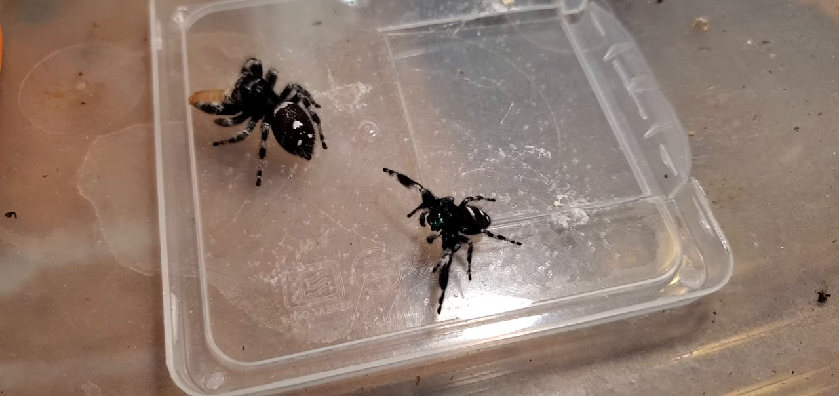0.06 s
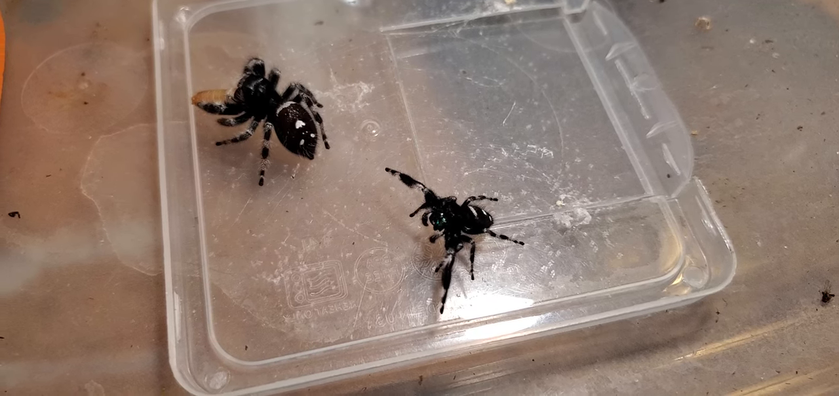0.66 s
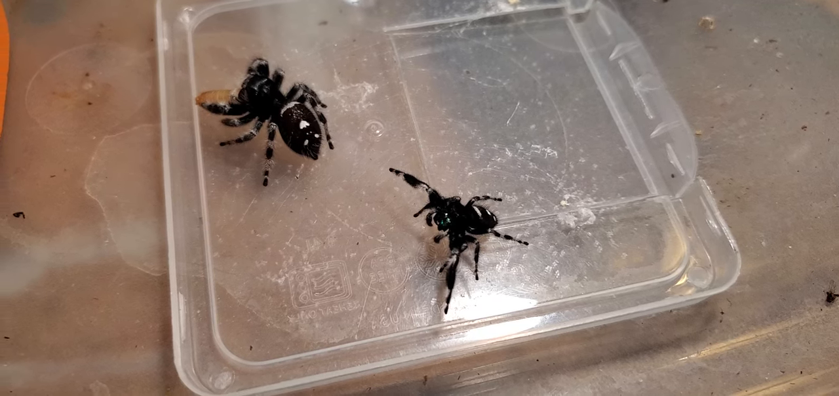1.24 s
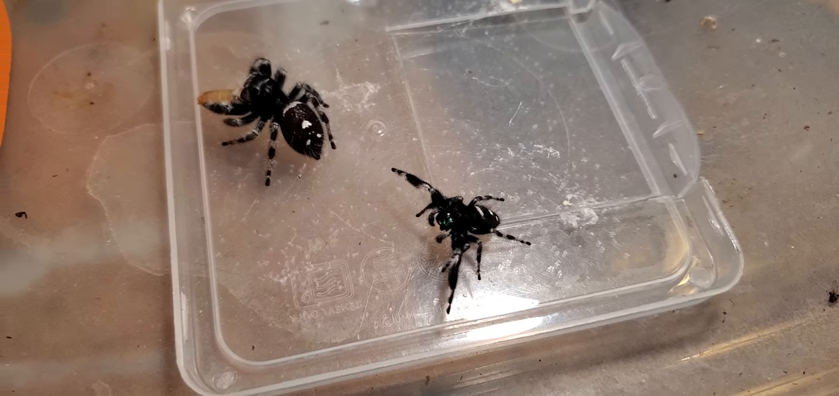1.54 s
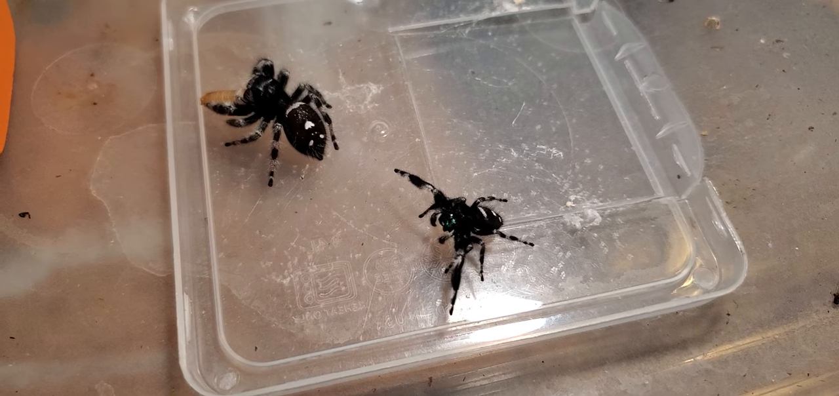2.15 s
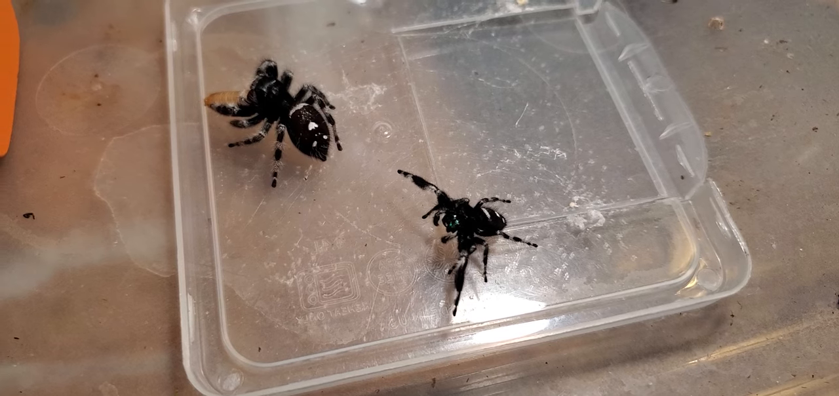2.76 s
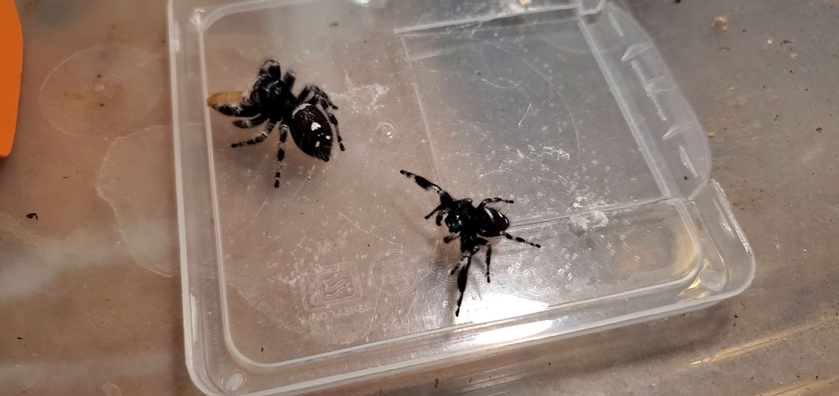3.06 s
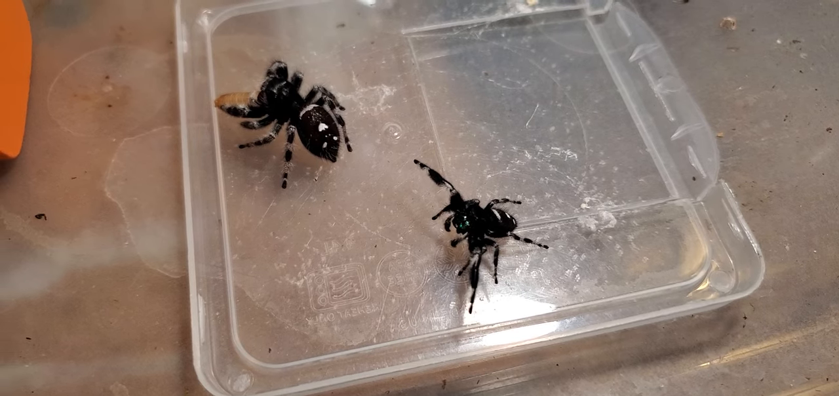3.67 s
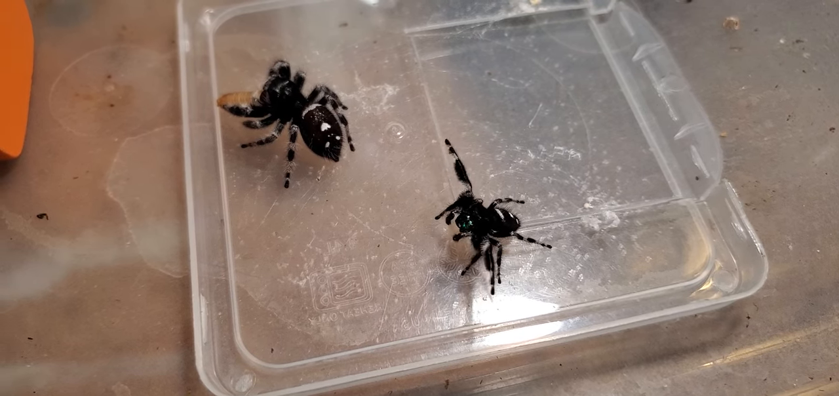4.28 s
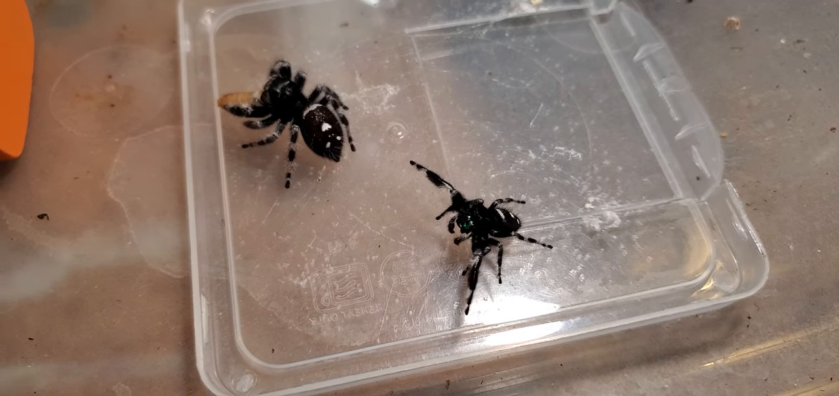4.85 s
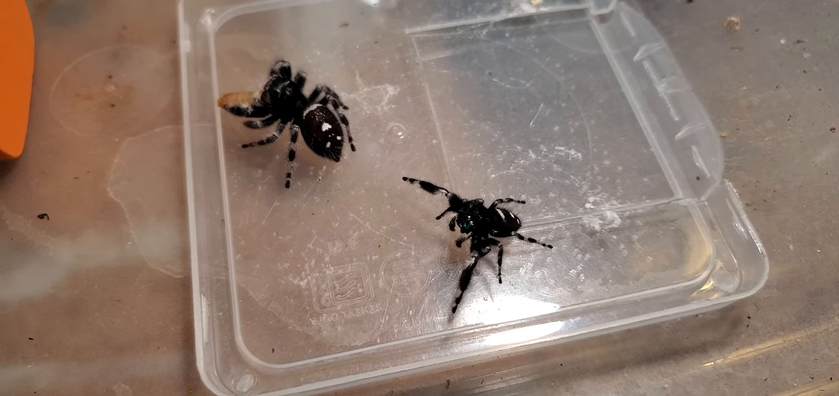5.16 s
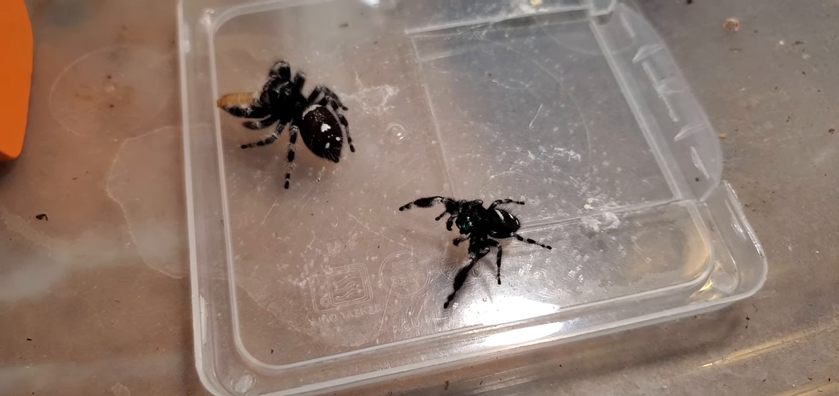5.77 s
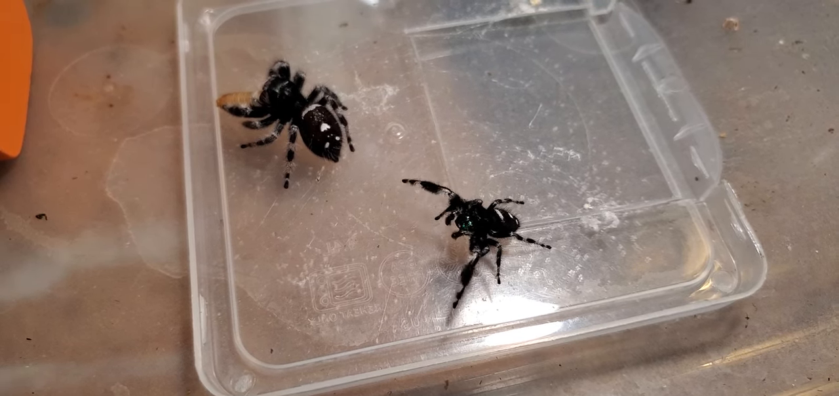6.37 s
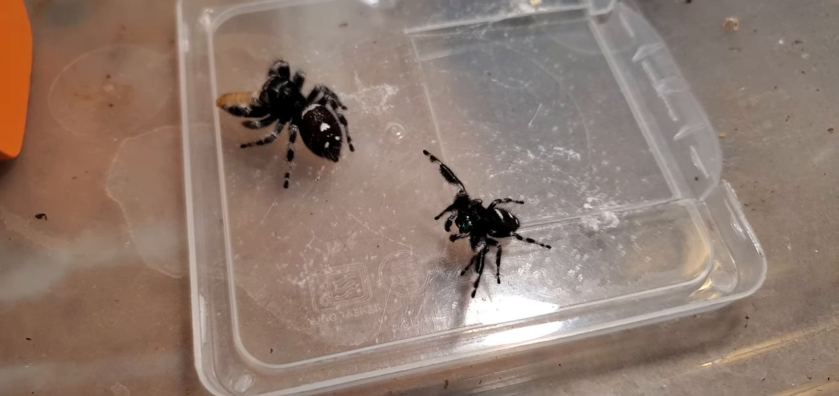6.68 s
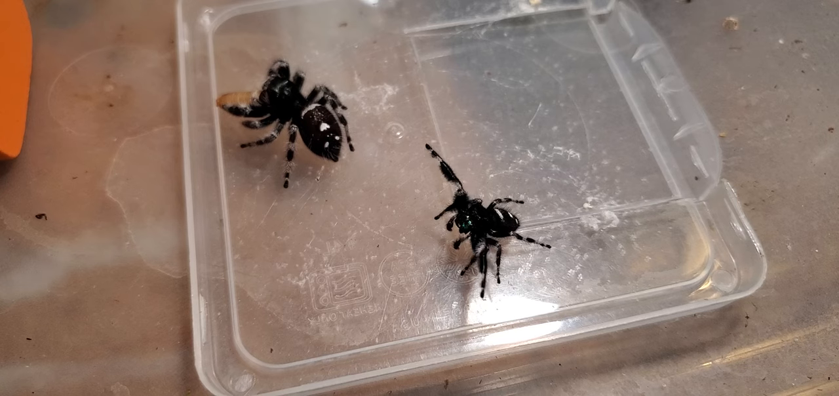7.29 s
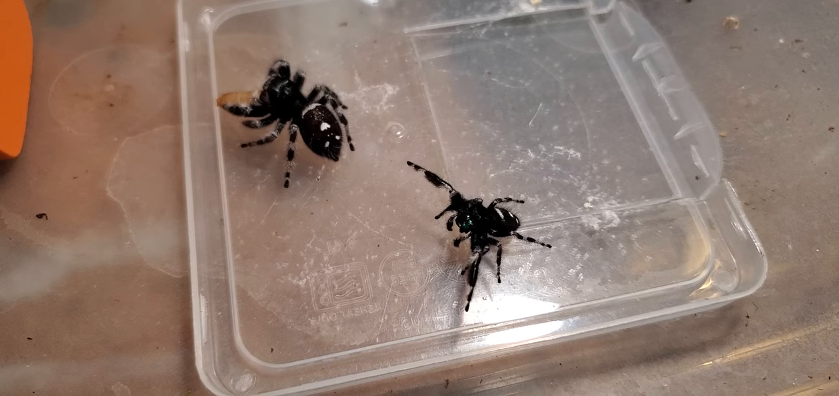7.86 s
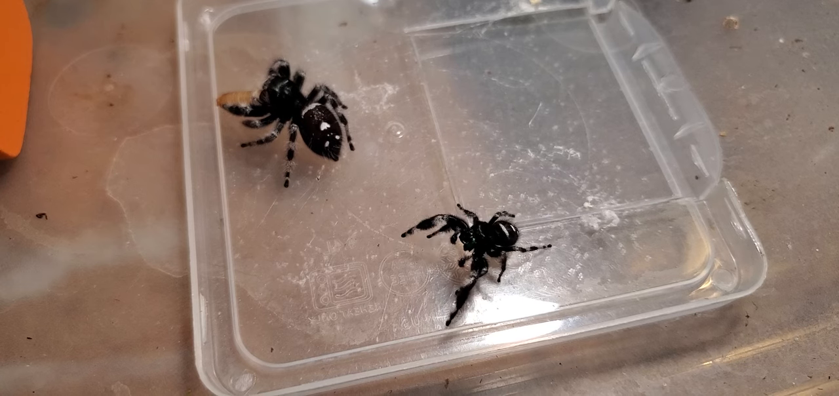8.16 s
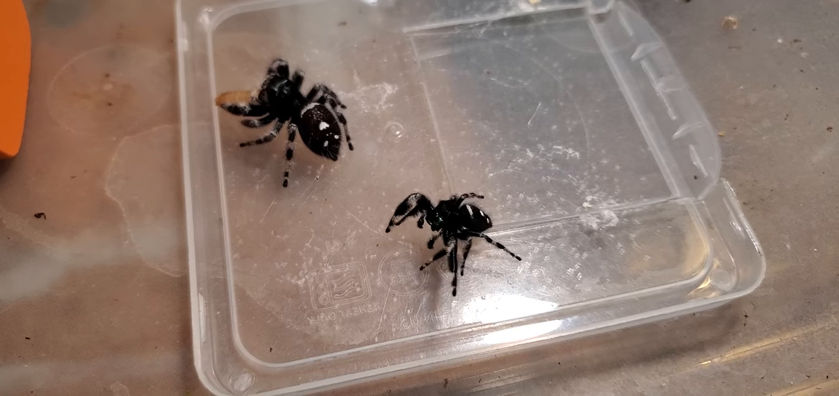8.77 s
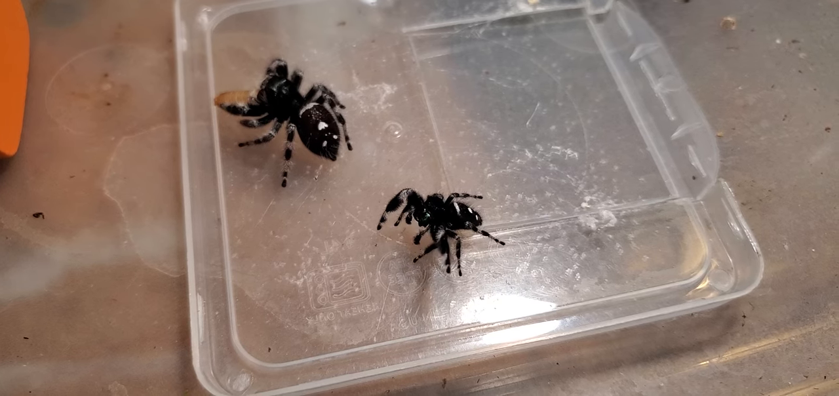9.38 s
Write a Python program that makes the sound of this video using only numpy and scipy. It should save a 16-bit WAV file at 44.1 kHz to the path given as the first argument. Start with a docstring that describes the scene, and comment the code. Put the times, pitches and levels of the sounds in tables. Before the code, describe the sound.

A quiet room is heard through a hand-held phone for about ten seconds. From the start, a fridge-like compressor gives a steady low hum that slowly swells and sinks, fullest around 4.5 seconds, with a faint, constant higher buzzing tone above it. Underneath lies a soft rumble of moving air, and on top a fine, even hiss, slightly brighter on the left. At about 0.7 seconds a finger bumps the phone, making one short, dull thump with a tiny tick, almost entirely on the right. A much fainter nudge follows on the same side at about 2.9 seconds. Between roughly 7 and 8 seconds a thin, very high, faint sizzle fades in on the left and stays, flickering slightly. The hum, air and hiss continue to the end.

```python
"""A quiet room with a fridge-like compressor running, heard by a hand-held phone with two microphones.
The motor buzzes once a turn and its hum beats slowly against other machines. Under it lies a bed of
moving air, rumbling in the room's modes, with a fine hiss on top. A finger bumps the phone beside the
right microphone and later nudges it again. Near the end a thin sizzle fades in on the left."""
import sys
import numpy as np
from scipy import signal
from scipy.fft import rfft, irfft
from scipy.io import wavfile
from scipy.ndimage import uniform_filter1d

SR = 44100
rng = np.random.default_rng(int(sys.argv[2]) if len(sys.argv) > 2 else 0)


def store_pcm(level_fs):
    """Save levels as 16-bit WAV."""
    pcm = np.round(np.clip(level_fs, -1, 1) * 32767).astype(np.int16)
    wavfile.write(sys.argv[1], SR, np.atleast_2d(pcm).T)


N = 424683

SHAFT_HZ = 58.02
# other motors and the mains, beating with the hum: f/Hz, level/dB re the hum, in step with it at t/s
NEIGHBOUR_HUMS = [(57.53, -15, 4.64), (58.67, -12, 4.33), (59.89, -18.5, 4.58)]
# partials of the motor's buzz: multiple of the shaft rate, left level/dB, right level/dB
BUZZ_PARTIALS = [(2, -62.5, -69.5), (3, -80, -77), (4, -68.5, -79), (15, -79, -90), (16, -79, -75),
                 (17, -67.5, -85), (20, -81, -75.5), (23, -70.5, -80), (26, -81, -71), (27, -87, -80),
                 (28, -64, -76.5), (29, -68, -63.5), (30, -62, -61), (31, -109, -79), (32, -70, -91),
                 (33, -85, -87), (34, -102, -72), (44, -87, -70), (59, -80.5, -105), (68, -84, -106),
                 (69, -82, -106)]
# how air and motor reach the two microphones: f/Hz, likeness (0-1), left phase lead/rad
STEREO_IMAGE = [(50, 0.82, 0.83), (110, 0.73, 0.36), (230, 0.92, 0.22), (358, 0.87, 0.63),
                (480, 0.46, 1.05), (620, 1, 1.4), (784, 0.6, 1.24), (1250, 0.2, 1.56), (1310, 0.1, 2.7),
                (1672, 0.59, 4.92), (1772, 0.4, 4.75), (1858, 1, 9.4), (2090, 0, 12.2), (2600, 0.18, 12.83)]
# rush of air before the room's modes colour it: f/Hz, left level/dB, right level/dB (both per Hz)
AIR_SPECTRUM = [(19.5, -94, -88.5), (48.3, -79, -73), (82, -73, -74), (151, -82, -86.5), (250, -83, -87.5),
                (362, -77, -82), (423.6, -89.5, -97.5), (756, -88, -95.5), (1320, -93.5, -94),
                (1876, -93, -85), (2000, -90.5, -95.5), (2677, -96.5, -89.5), (3295, -108, -110),
                (5800, -130, -135)]
# the room's standing waves and the nulls between them: f/Hz, width/Hz, lift/dB
ROOM_RESONANCES = [(80, 15, 4.5), (172, 18, 3.5), (187, 10.4, -6.5), (203, 10, 3.5), (236, 11.4, 8.5),
                   (294.5, 36, 5), (415.6, 30, 7.5), (524, 41, 5.5), (609, 29, 6), (741, 65, -5.5)]
# fine hiss at the microphones: f/Hz, left level/dB, right level/dB (both per Hz)
HISS_SPECTRUM = [(2520, -104, -112), (3750, -98, -113), (4230, -99.5, -116), (5010, -107, -124),
                 (7200, -112.5, -129), (7560, -109, -131), (8130, -116, -130), (11200, -120, -126),
                 (11600, -118, -122.5), (13900, -114, -125), (14600, -108, -125)]
# finger touching the phone: t/s, thud gain/dB, tick gain/dB
FINGER_BUMPS = [(0.6972, -4.5, -12), (2.935, -20, -70)]
# brief rings of the phone's case that make up the tick: f/Hz, peak at t/s, relative level/dB
CASE_MODES = [(444, 0.00054, -0.5), (1360, 0.00039, -19), (2500, .00025, -22)]


def undb(db):
    """Decibels to gain."""
    return 10 ** (np.asarray(db) / 20)


def curves_at(table, hz):
    """A table's curves read at hz, along its first column on a log-frequency axis."""
    knots, *columns = np.transpose(table)
    return np.array([np.interp(np.log(hz + 1e-3), np.log(knots), column) for column in columns])


def wander(rate_hz):
    """Slow random modulation: steps at rate_hz, smoothed twice, with a spread of 1."""
    hold = int(SR / rate_hz)
    steps = np.repeat(rng.standard_normal(N // hold + 1), hold)
    smooth = uniform_filter1d(uniform_filter1d(steps, hold), hold)[:N]
    return smooth / smooth.std()


def noise_pair():
    """Bin frequencies and the spectra of two unrelated white noises at 0 dB per Hz."""
    return np.arange(N // 2 + 1) * SR / N, rfft(rng.standard_normal((2, N))) * np.sqrt(SR / 2)


def resonance(hz, centre_hz, width_hz):
    """Gain of a resonant peak, 1 at its centre."""
    return 1 / np.sqrt(1 + (2 * (hz - centre_hz) / width_hz) ** 2)


def fade_in(start_s, length_s):
    """0 until start_s, then a straight climb to 1, held."""
    return np.clip((np.arange(N) / SR - start_s) / length_s, 0, 1)


def hum(shaft_angle, level_db=-46, left_lead_rad=0.37, waver_db=0.6):
    """The shaft's own note swells and sinks as its neighbours drift in and out of step."""
    t = np.arange(N) / SR
    beating = 1 + sum(undb(db) * np.exp(2j * np.pi * (hz - SHAFT_HZ) * (t - in_step_s))
                      for hz, db, in_step_s in NEIGHBOUR_HUMS)
    note = beating * np.exp(1j * np.array([shaft_angle + left_lead_rad, shaft_angle]))
    return np.sqrt(2) * undb(level_db + waver_db * wander(5)) * note.imag


def buzz(shaft_angle, scatter_rad=0.25, waver_db=1.1, flutter_db=3.5, flutter_above_hz=2300):
    """One soft knock a turn shakes the housing, so its partials peak together; the high ones flutter."""
    out = np.zeros((2, N))
    for multiple, left_db, right_db in BUZZ_PARTIALS:
        hz = multiple * SHAFT_HZ
        _, lead = curves_at(STEREO_IMAGE, hz)
        phase = multiple * shaft_angle + scatter_rad * rng.standard_normal()
        wobble_db = flutter_db * wander(32) if hz > flutter_above_hz else waver_db * wander(5)
        gain = np.sqrt(2) * undb(wobble_db) * undb([[left_db], [right_db]])
        out += gain * np.cos([phase + lead / 2, phase - lead / 2])
    return out


def rasp(shaft_angle, centre_hz=4100, width_hz=1100, left_db=-99, right_db=-118):
    """A small puff of noise on each turn rings a high resonance of the housing."""
    hz, white = noise_pair()
    puffs = ((1 + np.cos(shaft_angle)) / 2) ** 2
    ring = irfft(white * resonance(hz, centre_hz, width_hz) ** 2, N)
    return puffs * ring * undb([[left_db], [right_db]])


def compressor(drift_hz=0.0199):
    """An induction motor at nearly steady speed: hum, buzz and rasp all ride on one shaft."""
    shaft_angle = 2 * np.pi * np.cumsum(SHAFT_HZ + drift_hz * wander(0.99)) / SR
    return hum(shaft_angle) + buzz(shaft_angle) + rasp(shaft_angle)


def room_air(swell_db=0.34, drone_hz=320, drone_width_hz=300):
    """Moving air coloured by the room's modes, narrow in the lows and mostly wide in the highs."""
    hz, (left, unrelated) = noise_pair()
    likeness, lead = curves_at(STEREO_IMAGE, hz)
    right = (likeness * left + np.sqrt(1 - likeness ** 2) * unrelated) * np.exp(-1j * lead)
    modes_db = sum(db * resonance(hz, centre, width) ** 2 for centre, width, db in ROOM_RESONANCES)
    spectra = np.array([left, right]) * undb(curves_at(AIR_SPECTRUM, hz) + modes_db)
    # the low drone breathes a little while the rest stays even
    drone = irfft(spectra * resonance(hz, drone_hz, drone_width_hz) ** 2, N)
    return irfft(spectra, N) + drone * (undb(swell_db * wander(4.4)) - 1)


def hiss(crossover_hz=9000, flicker_db=0.55, top_flicker_db=0.9, top_swell_db=0.5):
    """Fine, wide hiss, brighter on the left; the top end flickers most and lifts a little late on."""
    hz, white = noise_pair()
    spectra = white * undb(curves_at(HISS_SPECTRUM, hz))
    top_share = hz ** 8 / (hz ** 8 + crossover_hz ** 8)
    body = irfft(spectra * (1 - top_share), N)
    top = irfft(spectra * top_share, N)
    lift_db = -0.5 + 1.5 * fade_in(start_s=7, length_s=0.5)
    top_db = lift_db + top_swell_db * wander(2) + top_flicker_db * wander(9)
    return (body + top * undb(top_db)) * undb(flicker_db * wander(12))


def finger_bumps(thud_hz=86, sag_s=0.051, thud_s=0.018, give_s=0.0019, left_bleed_db=-42, soft_hz=3000):
    """A soft fingertip ticks on the case, then the phone rocks for a few cycles; almost hard right."""
    touches = np.zeros(N)
    for start_s, thud_db, tick_db in FINGER_BUMPS:
        age = np.maximum(np.arange(N) / SR - start_s, 0)
        knock, *overtones = (
            undb(db) * np.sin(2 * np.pi * hz * age) * age / peak_s * np.exp(1 - age / peak_s)
            for hz, peak_s, db in CASE_MODES)
        tick = sum(overtones) - knock
        push_age = np.maximum(age - give_s, 0)  # the flesh gives before it pushes
        cycles = thud_hz * sag_s * (1 - np.exp(-push_age / sag_s))  # rocking slows as contact loosens
        envelope = np.sqrt(push_age / thud_s) * np.exp(-(push_age / thud_s) ** 2)
        thud = envelope * np.sin(2 * np.pi * cycles)
        touches += undb(tick_db) * tick + undb(thud_db) * thud
    softened = signal.sosfilt(signal.butter(2, soft_hz, fs=SR, output="sos"), touches)
    return np.array([undb(left_bleed_db) * softened, softened])


def sizzle(level_db=-79, skirt_db=-11, flicker_db=2.5):
    """A thin band of treble on a faint broad skirt fades in hard left and stays, flickering."""
    hz, (core, skirt) = noise_pair()
    core *= resonance(hz, centre_hz=10600, width_hz=900)
    skirt *= undb(skirt_db) * resonance(hz, centre_hz=12000, width_hz=5500) ** 2
    left = irfft(core + skirt, N)
    gain = undb(level_db - flicker_db * wander(4)) * fade_in(start_s=7.2, length_s=1.0)
    return np.array([gain * left / left.std(), np.zeros(N)])


def scene():
    """The mix: a bed of motor, air and hiss, then the finger bumps and the late sizzle."""
    return compressor() + room_air() + hiss() + finger_bumps() + sizzle()


def record(dry):
    """The phone rolls off the top end steeply."""
    cutoff_hz = 15800
    return signal.sosfilt(signal.ellip(12, .1, 80, cutoff_hz, fs=SR, output="sos"), dry)


dry = scene()
out = record(dry)
store_pcm(out)
```